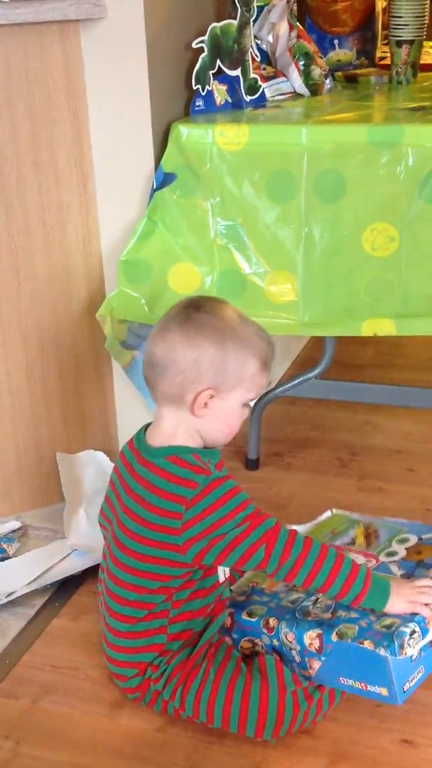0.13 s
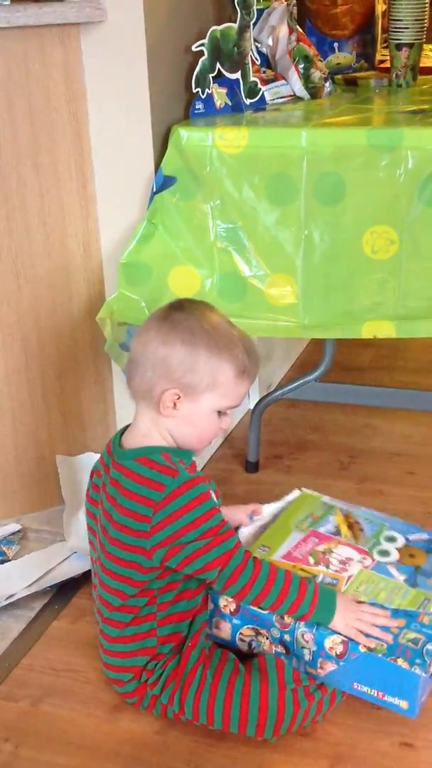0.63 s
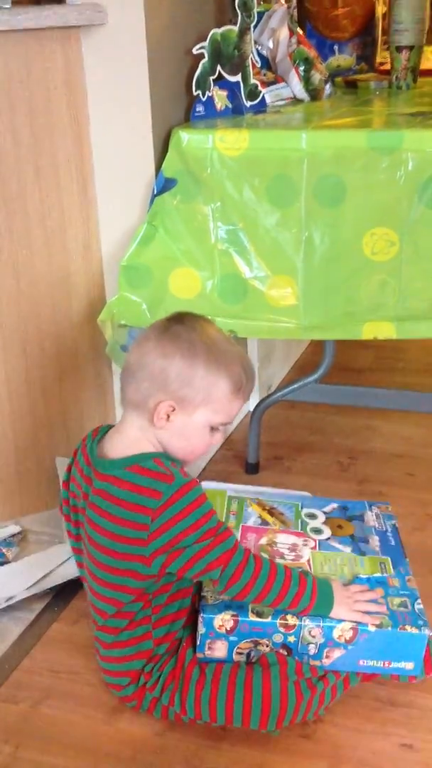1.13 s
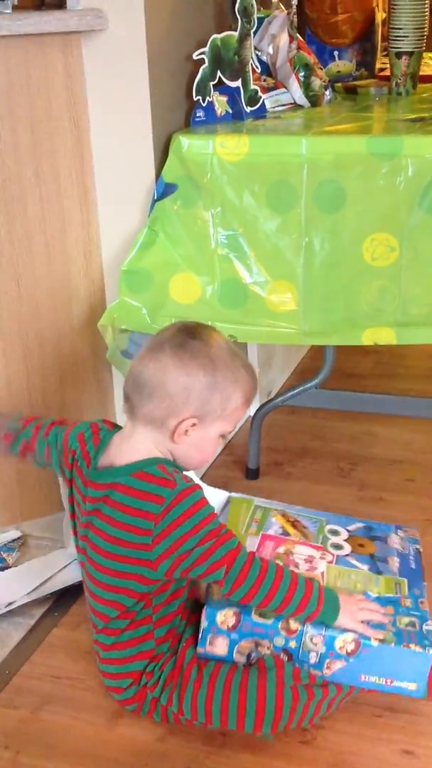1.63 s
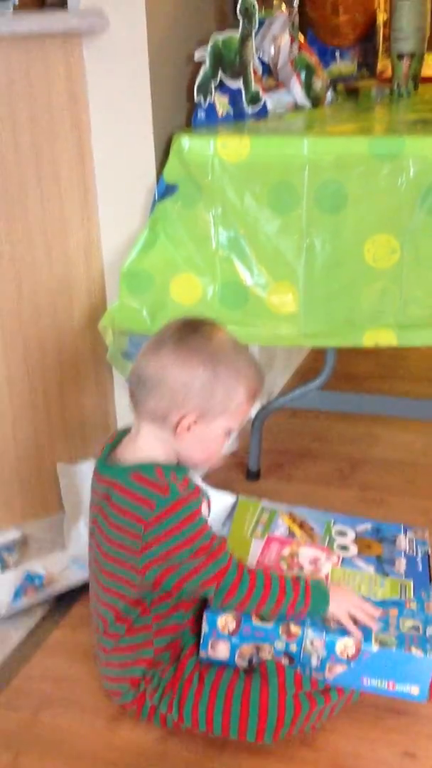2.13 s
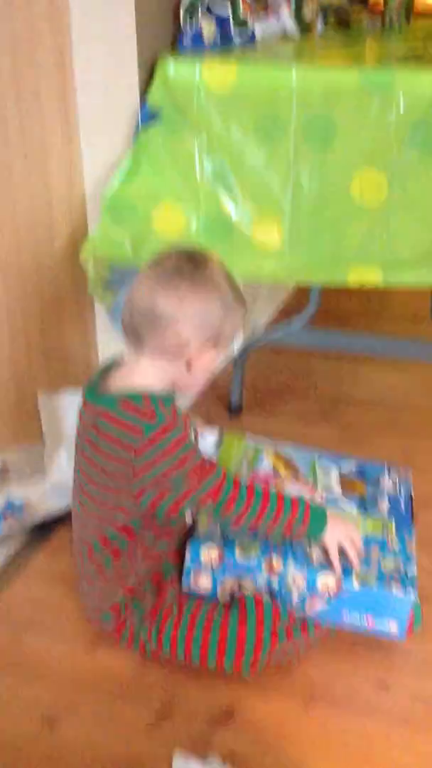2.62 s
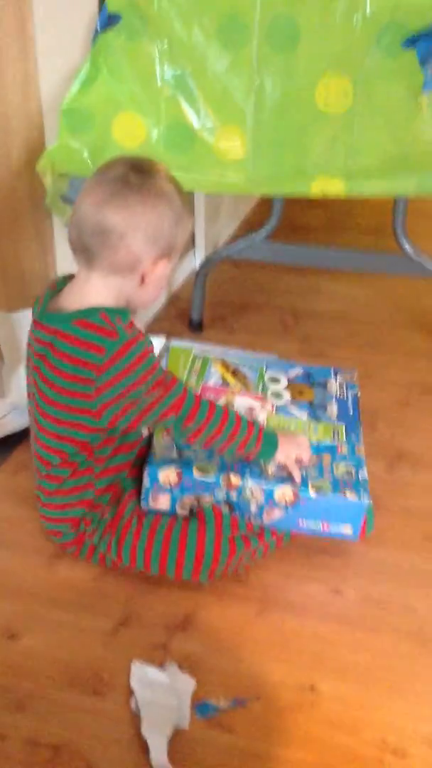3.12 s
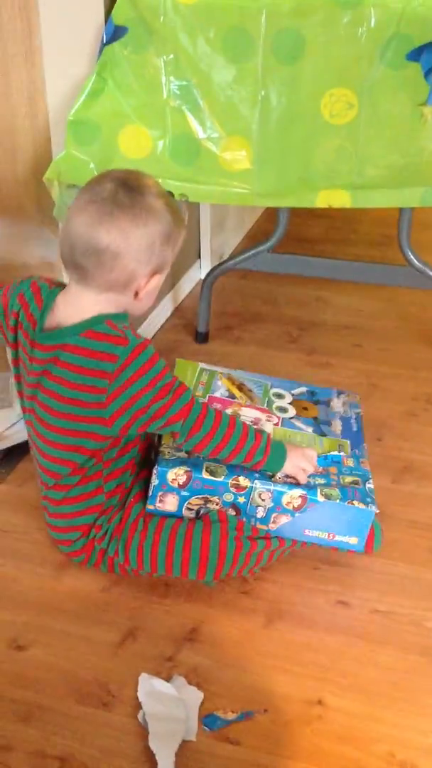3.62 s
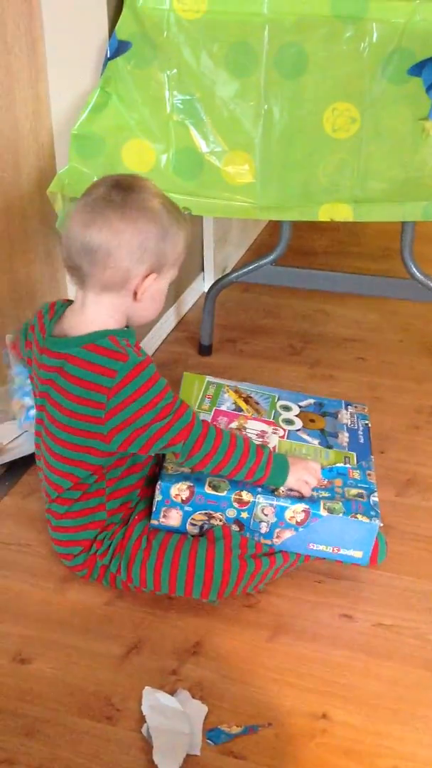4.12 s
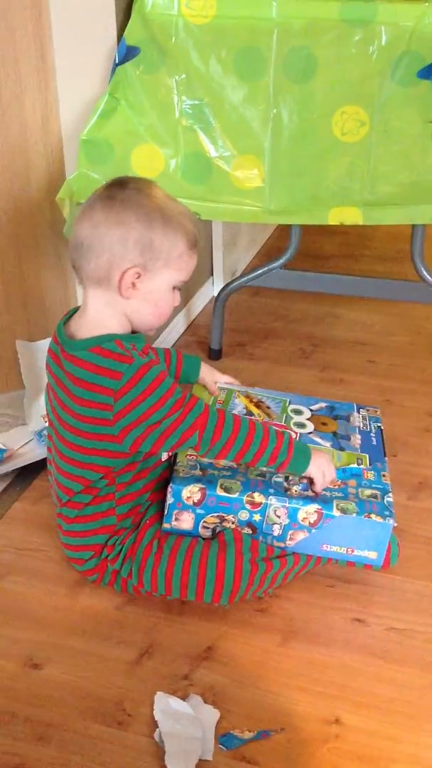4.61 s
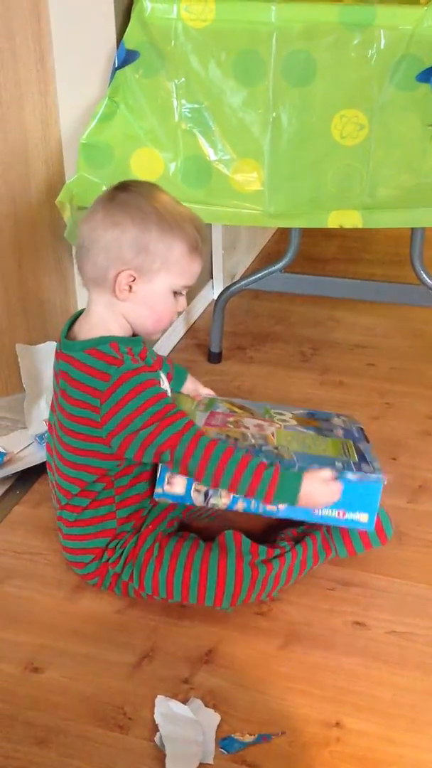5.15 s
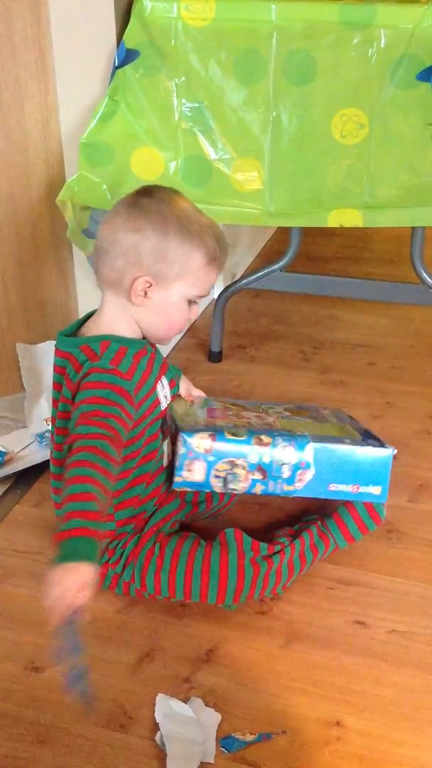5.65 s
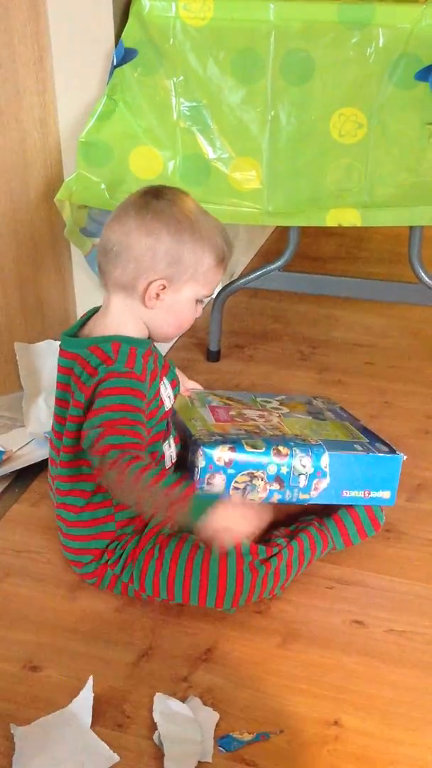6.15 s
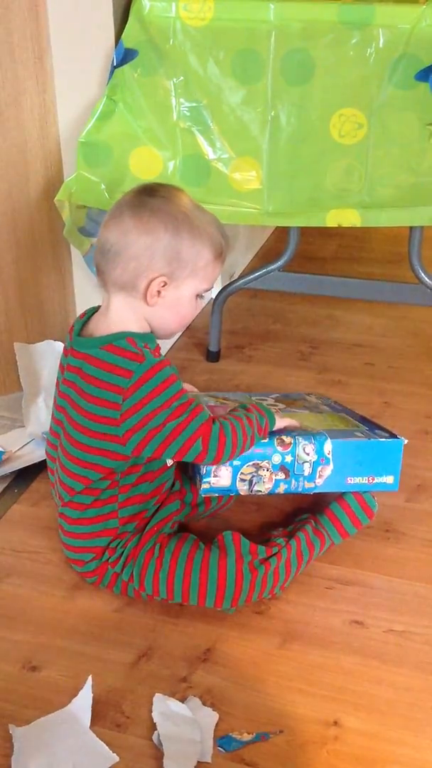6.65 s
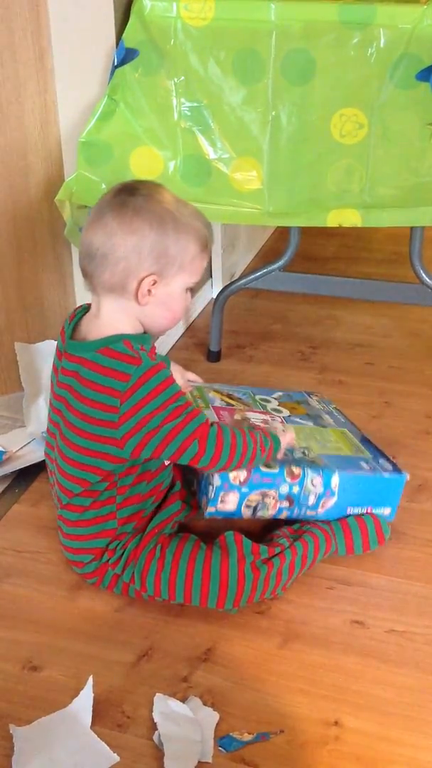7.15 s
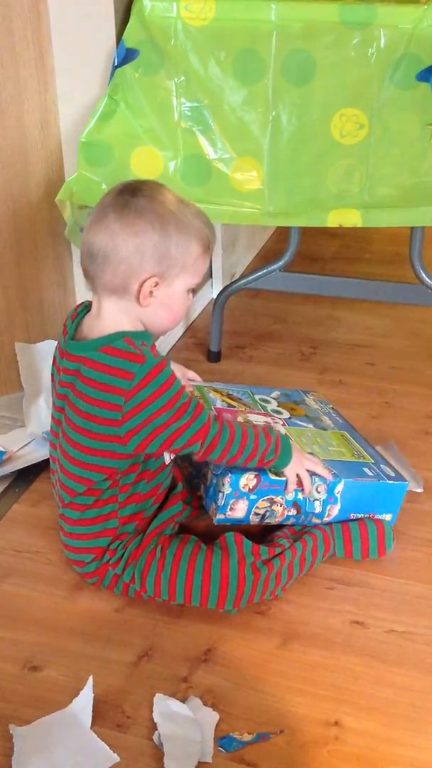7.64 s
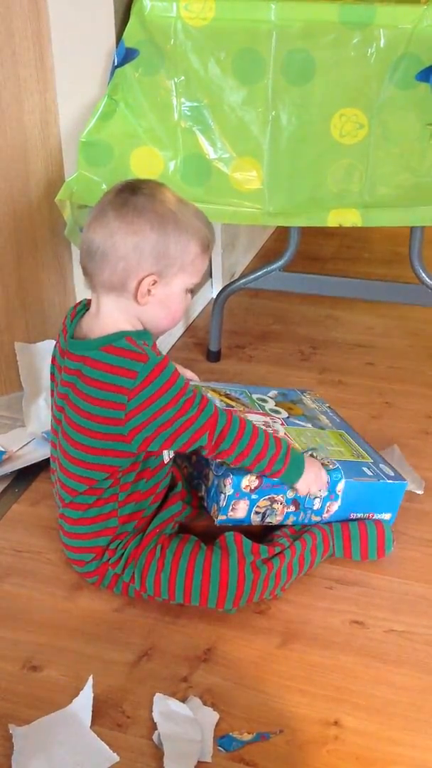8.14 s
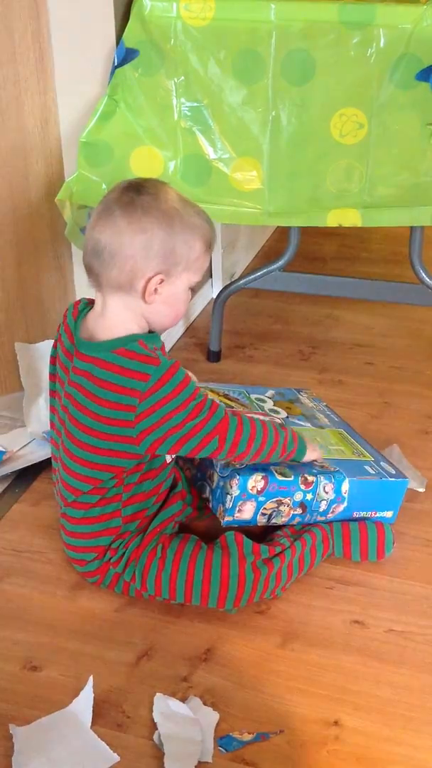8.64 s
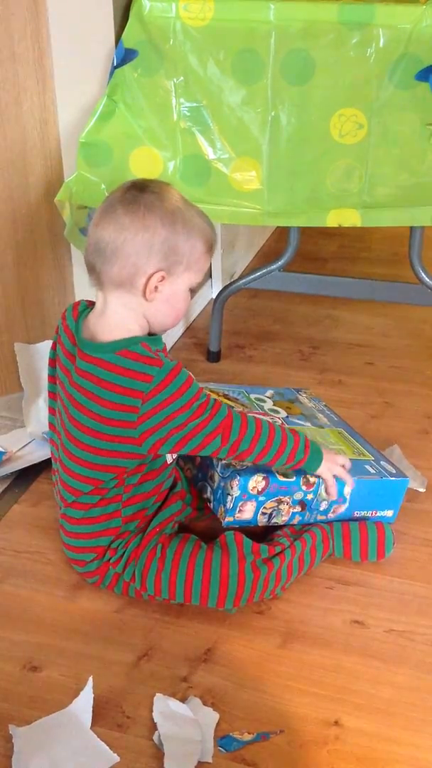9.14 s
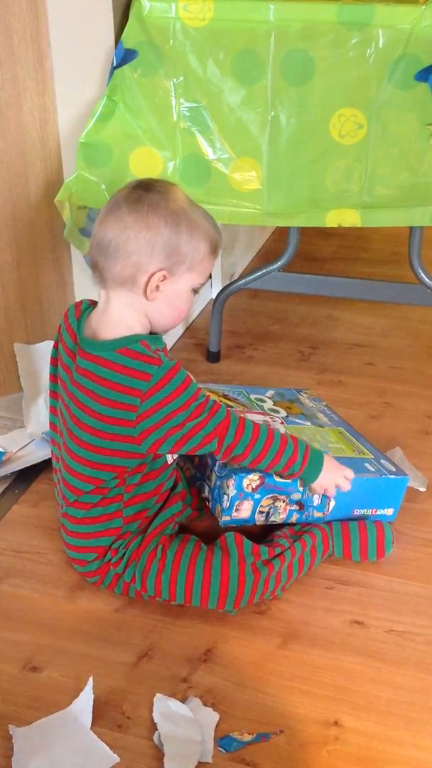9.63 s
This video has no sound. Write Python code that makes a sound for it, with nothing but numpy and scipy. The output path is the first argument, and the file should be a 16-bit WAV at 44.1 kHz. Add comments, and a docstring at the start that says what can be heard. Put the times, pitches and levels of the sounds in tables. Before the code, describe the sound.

Wrapping paper rips in loud bursts off a hollow cardboard box in a quiet room, then settles into light rustles, knocks and crisp snaps.

```python
"""Wrapping paper is torn off a hollow cardboard box held on a lap, in a quiet room, over a bed of hiss.
Rustle and rubbing lead to a first rip before 1 s and a knock just after it; at 2 s the box groans as it bends.
A big rip follows near 3.4 s with the sheet singing taut, a longer one near 4.7 s, and a taut whine near 5.2 s.
Lighter rustles, rubs, knocks and snaps come after, and the snaps crowd together from 9 s to the end.
Paper is filtered random clicks, the box a set of ringing wall modes, the groan a pair of wavering tones."""
import sys
import numpy as np
from scipy import signal
from scipy.fft import rfft, irfft
from scipy.io import wavfile

SR = 44100
rng = np.random.default_rng(int(sys.argv[2]) if len(sys.argv) > 2 else 0)


def invert_db(level):
    """Linear amplitude ratio for a level in decibels (20 dB per decade), elementwise."""
    return 10 ** (np.asarray(level, dtype=float) / 20)


def output_pcm(signal):
    """Save a mono or channel-first signal as 16-bit PCM at the path in sys.argv[1].

    Samples are clipped to [-1, 1] before scaling.
    """
    pcm = np.clip(np.atleast_2d(signal).T, -1, 1) * 32767
    wavfile.write(sys.argv[1], SR, np.round(pcm).astype(np.int16))


N = 430857

# Paper pulled, torn or crumpled: (start [s], rise [s], hold [s], level of the middle before it sags [dB],
# treble over that level before it fades [dB])
PAPER_PULLS = [(0.03, 0.004, 0.2, -44, -2.5), (0.489, 0.009, 0.099, -42, -3.5),
               (0.708, 0.0065, 0.18, -47, -0.5), (0.82, 0.078, 0.026, -26, -1),
               (1.393, 0.045, .01, -39, -1), (1.433, 0.0083, 0.073, -32, 0.5),
               (1.957, 0.065, 0.16, -56.5, -5), (2.333, 0.086, 0.0082, -50.5, -10),
               (2.543, 0.035, 0.11, -53.5, -16), (2.816, 0.2, 0.013, -46.5, -5.5),
               (3.21, 0.08, 0.16, -51, -6), (3.376, 0.027, 0.088, -24, 0.5),
               (3.558, 0.024, 0.028, -41.5, -3), (4.166, 0.027, 0.26, -57.5, -5),
               (4.58, .006, 0.15, -53.5, 2), (4.722, 0.093, 0.41, -31.5, -1.5), (4.801, 0.026, .06, -35, 2),
               (5.254, 0.016, .008, -34, 0), (5.785, 0.032, 0.01, -56.5, 1),
               (6.331, 0.007, 0.0063, -40, -9), (6.975, 0.049, 0.013, -45, -7.5),
               (7.737, 0.02, 0.023, -53.5, -3.5), (7.954, 0.068, 0.0075, -52.5, -4),
               (8.036, .03, 0.015, -48.5, -10), (8.178, 0.013, 0.016, -55.5, -4),
               (8.339, 0.025, 0.0067, -50.5, -11), (8.671, 0.096, 0.0077, -49, -10),
               (8.902, 0.13, 0.0027, -48, -6), (9.195, 0.0048, 0.01, -42.5, -8.5),
               (9.24, 0.04, 0.027, -48.5, -5), (9.458, .13, 0.038, -42.5, -5),
               (9.693, 0.0034, 0.04, -45.5, -2)]
# Restless hands beneath the gestures: (time [s], level of the paper's middle [dB])
FIDGETING = [(0.0, -57.5), (1.3, -60.5), (1.92, -69), (2.3, -65.5), (3.3, -55), (3.8, -61), (4.5, -73.5),
             (5.45, -68.5), (6.3, -78), (7.5, -68), (8.55, -70), (9.77, -60.5)]
# Colour of the paper, relative: (frequency [Hz], density [dB per Hz])
PAPER_SPECTRUM = [(470, -38), (800, 19.5), (940, -16), (1230, -3), (2600, -1), (4430, -3), (6040, -5.5),
                  (7740, -8), (14600, -9), (15500, -11)]
# The sheet pulled taut sings in a narrow band as it rips: (centre time [s], length [s], frequency [Hz], level [dB])
TAUT_RIPS = [(3.425, 0.069, 2100, -24), (3.434, 0.09, 3750, -25), (5.19, 0.13, 2680, -31),
             (5.277, 0.048, 1960, -34)]
# Single creases snap and fingers tick: (time [s], peak [dB], centre [Hz], crackle after the click [dB])
CREASE_SNAPS = [(0.4953, -33, 6400, 9), (0.583, -29, 1380, -1), (0.675, -33, 5600, -17),
                (0.7036, -21.5, 1980, -2), (0.7612, -33, 6430, -16), (0.8301, -17.5, 2130, -1),
                (1.184, -30.5, 4800, 3), (1.6646, -29, 5540, 6), (2.0727, -37, 2300, 4),
                (2.3598, -41, 1870, -2), (2.4074, -37, 3700, 4), (2.899, -46, 3590, -4),
                (2.943, -35, 3740, -19), (3.005, -33.5, 5920, 7), (3.0997, -16.5, 2870, -14),
                (3.2118, -30, 3760, -5), (3.267, -38, 6100, -3), (3.3809, -25, 2460, -2),
                (4.0338, -39.5, 3360, -4.5), (4.271, -37, 2630, -11), (4.3181, -37, 4300, 0),
                (4.587, -29.5, 5650, -15), (4.7292, -23, 3300, -17), (5.467, -41, 2820, -6),
                (6.341, -36, 3180, -3), (6.868, -34, 1400, 8), (6.8772, -28, 2440, 10),
                (7.575, -32, 2630, -9), (7.974, -35, 2700, -13), (8.0552, -32, 2920, 6),
                (8.793, -34.5, 2600, 3), (9.0221, -25.5, 5350, 10), (9.1935, -23, 4470, -5),
                (9.2934, -27.5, 5770, -8), (9.5213, -26, 6700, -18), (9.531, -29, 6700, -17),
                (9.5658, -25.5, 6150, 16), (9.592, -27, 5500, -8), (9.699, -23, 2920, -20),
                (9.718, -25.5, 3050, -16)]
# A hand or the lap slides over the box: (start [s], rise [s], hold [s], level [dB],
# tilt of the wall modes [dB per octave])
BOX_RUBS = [(0.0, 0.16, 0.13, -49.5, 1), (0.405, 0.17, 0.009, -47, 2), (0.634, 0.062, .12, -55, 7),
            (0.785, 0.092, 0.0069, -29.5, 8), (1.223, 0.067, 0.15, -53, -10),
            (1.42, 0.02, 0.0036, -37.5, 5), (1.926, 0.2, 0.031, -49, 5), (2.346, 0.018, 0.07, -56.5, -2),
            (2.548, 0.034, 0.018, -47.5, 8), (2.667, 0.046, 0.013, -47, -7.5),
            (2.894, 0.095, 0.0082, -43.5, -4), (3.196, 0.012, 0.0074, -49, -1),
            (3.359, 0.072, 0.066, -35.5, -3.5), (3.583, 0.049, 0.048, -52, -5), (4.176, 0.1, .14, -58, 8.5),
            (4.674, 0.2, 0.012, -36, 5), (4.858, 0.049, 0.29, -42.5, 2), (6.329, 0.0099, 0.0034, -53.5, -8),
            (6.958, 0.024, 0.026, -47.5, -2.5), (7.641, 0.1, .01, -51.5, -4.5),
            (7.833, 0.056, 0.49, -63.5, -9), (8.567, 0.0075, 0.0045, -43.5, -3.5),
            (8.843, 0.2, .01, -59, -10), (9.167, 0.084, 0.0054, -50.5, 0), (9.335, 0.22, .01, -51, -3)]
# Blows on the box: (time [s], peak [dB], centre [Hz])
BOX_KNOCKS = [(1.036, -30, 740), (2.751, -39, 260), (3.214, -38, 400), (5.586, -59.5, 254),
              (6.226, -50.5, 414), (6.873, -33.5, 670), (7.629, -47, 675), (8.582, -34, 147)]
# Modes of the box walls: (frequency [Hz], relative level [dB], time to fall 60 dB [s])
WALL_MODES = [(140, -10.5, 0.095), (161.6, -9, 0.19), (201.3, -1, 0.16), (255.5, 5.5, 0.06),
              (304.4, 8.5, 0.12), (350, 8, 0.048), (427.7, 12.5, 0.031), (490, 5.5, 0.053),
              (559.4, 11.5, 0.022), (655.3, 7, 0.084), (733, -0.5, 0.042), (838, -1, 0.037),
              (1016, -1.5, 0.056)]
# A panel groans as it bends: (time [s], moving tone [Hz], level of moving tone [dB], level of low hum [dB])
PANEL_GROAN = [(1.989, 400, -52, -68), (2.02, 410.5, -53, -44), (2.045, 490, -45.5, -77),
               (2.065, 542, -46, -57), (2.09, 586, -51, -48), (2.172, 539, -60, -76)]
# Decay of the room: (frequency [Hz], time to fall 60 dB [s])
ROOM_DECAY = [(150, 0.27), (4000, 0.35), (14000, 0.21)]
# Colour of the microphone noise, relative: (frequency [Hz], density [dB per Hz])
HISS_SPECTRUM = [(18, -65), (102, -25), (123, -15), (168, -15.5), (202, -3.5), (315, -18), (5040, -21.5),
                 (15500, -22.5)]


def rms_one(x):
    """Scale to unit power."""
    return x / np.sqrt(np.mean(x ** 2) + 1e-20)


def in_time(rows):
    """Table columns as curves over all samples."""
    s, *columns = np.transpose(rows)
    return [np.interp(np.arange(N) / SR, s, c) for c in columns]


def at_hz(points, hz):
    """Read a spectrum on a log-frequency axis."""
    table_hz, values = np.transpose(points)
    return np.interp(np.log(hz), np.log(table_hz), values)


def band(x, low_hz, high_hz):
    """Butterworth band-pass, second order on each side."""
    return signal.sosfilt(signal.butter(2, [low_hz, high_hz], "band", fs=SR, output="sos"), x)


def drift(rate_hz):
    """Slow random wander of spread 1: noise at a fortieth of the sample rate through two equal low-passes."""
    r = np.exp(-80 * np.pi * rate_hz / SR)
    slow = signal.lfilter([1], [1, -2 * r, r * r], rng.standard_normal(N // 40 + 2002))[2000:]
    return np.interp(np.arange(N) / 40, np.arange(len(slow)), rms_one(slow))


def ring(force, hz, t60):
    """A resonator: a unit click sets a sine of height 1 ringing, 60 dB down after t60 seconds."""
    r, w = invert_db(-60 / (t60 * SR)), 2 * np.pi * hz / SR
    return signal.lfilter([0, np.sin(w)], [1, -2 * r * np.cos(w), r * r], force + 1e-18)


def grains(per_s, spread_db):
    """Random clicks of either sign with uneven sizes; unit power."""
    sizes = invert_db(spread_db * np.minimum(rng.exponential(1, N), 5)) * rng.choice([-1, 1], N)
    return rms_one(sizes * (rng.random(N) < per_s / SR))


def gesture(start, rise, hold, rise_power, release_db_per_s):
    """At most one second of ramp, hold and steady dB fade; gives samples, age, gain and time since release."""
    at = np.arange(round(start * SR), min(round((start + 1) * SR), N))
    age = at / SR - start
    released = np.maximum(age - rise - hold, 0)
    ramp = np.clip(age / rise, 0, 1) ** rise_power
    return at, age, ramp * invert_db(-release_db_per_s * released), released


def handling():
    """Pulls add in power over the fidgeting; gives middle level and treble over middle, in dB."""
    middle = invert_db(in_time(FIDGETING)[0]) ** 2
    treble = middle * invert_db(-1.5) ** 2
    for start, rise, hold, level_db, treble_db in PAPER_PULLS:
        at, age, gain, released = gesture(start, rise, hold, rise_power=0.97, release_db_per_s=185.5)
        # once a pull has started the body of the sound sags, the treble does not
        sag_db = 4 * (1 - np.exp(-age / .06))
        # on release the treble fades faster than the middle
        dulling_db = 52.5 * released
        middle[at] += (gain * invert_db(level_db - sag_db)) ** 2
        treble[at] += (gain * invert_db(level_db + treble_db - dulling_db)) ** 2
    return 10 * np.log10(middle), 10 * np.log10(treble / middle)


def paper(level_db, treble_db):
    """Fibres part in clumps of clicks, sparse under a light touch, dense in a rip; each third-octave flickers."""
    busy = np.clip(invert_db(.6 * (level_db + 34.5)), .18, 1)
    # a heavy rip runs more evenly than a light touch
    clumps = invert_db(4.0 * (1 - .75 * busy) * drift(25.0))
    fibres = [grains(3000.0 * busy * clumps, spread_db=-3.0) / np.sqrt(busy) for _ in range(2)]
    # big creases are heard in all bands at once
    creases = 0.4 * (1 - busy / 2) * grains(160.0 * clumps, spread_db=3.0)
    middle, treble = 0, 0
    edges = np.geomspace(800, 16000, 14)
    for k, (low, high) in enumerate(zip(edges, edges[1:])):
        hz = np.sqrt(low * high)
        flicker = invert_db(1.6 * drift(20.0))
        # neighbouring bands take different fibres
        clicks = rms_one(fibres[k % 2]) + creases
        part = invert_db(at_hz(PAPER_SPECTRUM, hz)) * flicker * band(clicks, low, high)
        if hz < 5500:
            middle = middle + part
        else:
            treble = treble + part
    return invert_db(level_db) * (rms_one(middle) + invert_db(treble_db) * rms_one(treble))


def taut_sheet():
    """Dense tearing clicks through a narrow band, swelling and fading in a bell shape."""
    t, fibres, out = np.arange(N) / SR, grains(3300.0, spread_db=0.0), 0
    for s, length, hz, level_db in TAUT_RIPS:
        swell = np.exp(-2 * ((t - s) / length * 2) ** 2)
        out += invert_db(level_db) * swell * rms_one(band(fibres, hz / 1.11, hz * 1.18))
    return out


def snaps():
    """Each snap is a sharp broad click that leaves its centre and a few paper modes around it ringing briefly."""
    out, t = np.zeros(N + SR), np.arange(SR // 10) / SR
    noise = rng.standard_normal((len(CREASE_SNAPS), len(t)))
    spread = rng.uniform(-0.79, 1, (len(CREASE_SNAPS), 6))
    for (s, peak_db, hz, tail_db), crackle, offsets in zip(CREASE_SNAPS, noise, spread):
        tail = invert_db(tail_db) * np.abs(crackle) / 2 * np.exp(-t / 0.016)
        burst = crackle * (np.exp(-t / 0.0011) + tail)
        modes = sum(ring(burst, hz * 2 ** (.6 * offset), t60=.008) for offset in offsets)
        modes = rms_one(modes) + .6 * rms_one(ring(burst, hz, t60=.009))
        click = 0.73 * modes + rms_one(band(burst, 1100, 10100))
        out[round(s * SR):][:len(t)] += invert_db(peak_db) * click / np.abs(click).max()
    return out[:N]


def sliding():
    """Rubs add in power over fidgeting and lap, each weighing on the tilt by its power; gives dB and tilt."""
    # the second term is the lap: the box is never quite still
    power = invert_db(in_time(FIDGETING)[0] - 2) ** 2 + invert_db(-75.5) ** 2
    tilted = power * -3  # dB per octave
    for start, rise, hold, level_db, tilt_db in BOX_RUBS:
        at, _, gain, _ = gesture(start, rise, hold, rise_power=1.58, release_db_per_s=123)
        rub_power = (gain * invert_db(level_db)) ** 2
        power[at] += rub_power
        tilted[at] += rub_power * tilt_db
    return 10 * np.log10(power), tilted / power


def rubbing(rub_db, tilt_db):
    """Lumpy friction drives the wall modes; a broad palm favours the low ones, fingertips the high ones."""
    friction = grains(1500.0 * invert_db(2.7 * drift(19.0)), spread_db=3.0)
    walls, power = 0, 0
    for hz, level_db, t60 in WALL_MODES:
        # the grip picks the wall that speaks
        grip_db = 3.1 * drift(3.2)
        gain = invert_db(level_db + tilt_db * np.log2(hz / 450) + grip_db)
        power += gain ** 2
        ringing = rms_one(ring(np.gradient(friction), hz, t60))
        scrape = rms_one(band(friction, hz / 1.216, hz * 1.071))
        walls += gain * rms_one(ringing + 0.8 * scrape)
    return invert_db(rub_db) * walls / np.sqrt(power)


def knocks():
    """Each blow is a short soft push that sounds the wall modes nearest its centre."""
    out, t = np.zeros(N + SR), np.arange(SR // 4) / SR
    hz, level_db, t60 = np.transpose(WALL_MODES)
    chance = rng.standard_normal((len(BOX_KNOCKS), 2, len(WALL_MODES)))
    for (s, peak_db, centre_hz), (strength, phase) in zip(BOX_KNOCKS, chance):
        # modes lose 13 dB per octave away from the centre
        gain = invert_db(level_db + 2.5 * strength - 13.0 * np.abs(np.log2(hz / centre_hz)))
        modes = gain * invert_db(-60 * t[:, None] / t60) * np.sin(2 * np.pi * hz * t[:, None] + phase)
        # a palm lands softly
        blow = modes.sum(axis=1) * (1 - np.exp(-t / 0.0017))
        out[round(s * SR):][:len(t)] += invert_db(peak_db) * blow / np.abs(blow).max()
    return out[:N]


def groan():
    """A stick-slip tone with its octave climbs and sinks back a little over a low hum; both waver together."""
    hz, moving_db, hum_db = in_time(PANEL_GROAN)
    t = np.arange(N) / SR
    during = (t >= PANEL_GROAN[0][0]) & (t <= PANEL_GROAN[-1][0])
    waver = 1 + 0.017 * drift(30.6)
    phase = 2 * np.pi * np.cumsum(hz * waver) / SR
    moving = invert_db(moving_db) * (np.sin(phase) + invert_db(-16.0) * np.sin(2 * phase))
    hum = invert_db(hum_db) * np.sin(2 * np.pi * np.cumsum(294 * waver) / SR)  # around 294 Hz
    return np.sqrt(2) * during * (moving + hum)


def room(x):
    """Dense reflections from 4 ms on, dying band by band."""
    t, echo, edges = np.arange(SR) / SR, 0, np.geomspace(80, 18000, 9)
    for low, high in zip(edges, edges[1:]):
        t60 = at_hz(ROOM_DECAY, np.sqrt(low * high))
        echo += band(rng.standard_normal(SR), low, high) * invert_db(-60 * t / t60) * (t > .004)
    return signal.fftconvolve(x, echo / np.sqrt(np.sum(echo ** 2)))[:N]


def hiss():
    """Steady microphone noise: white noise coloured in the frequency domain."""
    hz = np.maximum(np.arange(N // 2 + 1) * SR / N, 10)
    coloured = irfft(rfft(rng.standard_normal(N)) * invert_db(at_hz(HISS_SPECTRUM, hz)), N)
    return invert_db(-65.5) * rms_one(coloured)


def scene():
    """Paper and box share one room, its reflections 11 dB under the direct sound."""
    near = paper(*handling()) + snaps() + taut_sheet()
    near = near + rubbing(*sliding()) + knocks() + groan()
    return (invert_db(-11) * room(near) + near)[None]


def low_pass(x):
    """Removes everything above the highest recorded frequency."""
    return signal.sosfilt(signal.butter(12, 15450, fs=SR, output="sos"), x)


def record(dry):
    """The small microphone loses the deep bass, rings a little near 6 kHz and adds its hiss; the top is cut."""
    high_passed = signal.sosfilt(signal.butter(6, 140, "high", fs=SR, output="sos"), dry)
    # a trace of the deep bass is left
    thin = high_passed + invert_db(-34.0) * dry
    port = thin + .5 * signal.lfilter(*signal.iirpeak(6150, 7.0, fs=SR), thin)
    heard = signal.sosfilt(signal.cheby2(12, 50, 16050, fs=SR, output="sos"), port + hiss())
    return low_pass(heard)


dry = scene()
out = record(dry)
output_pcm(out)
```